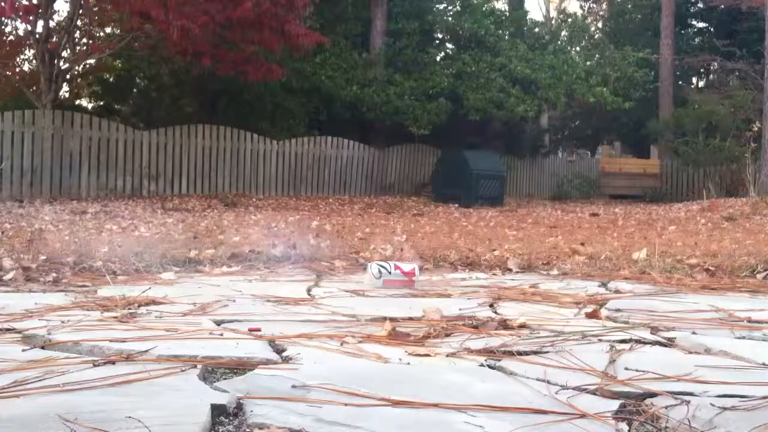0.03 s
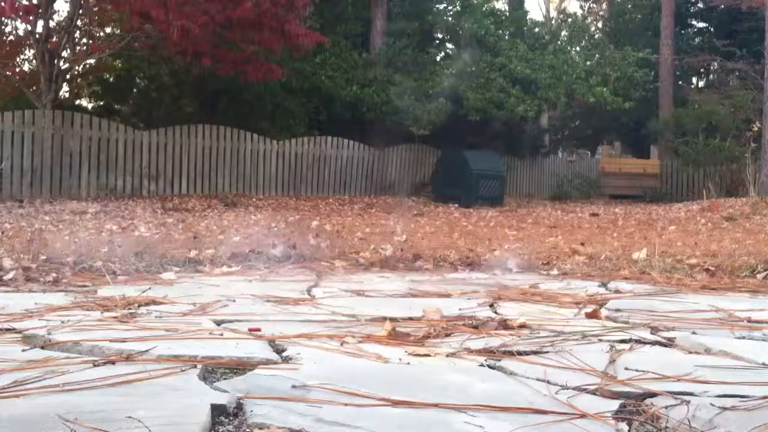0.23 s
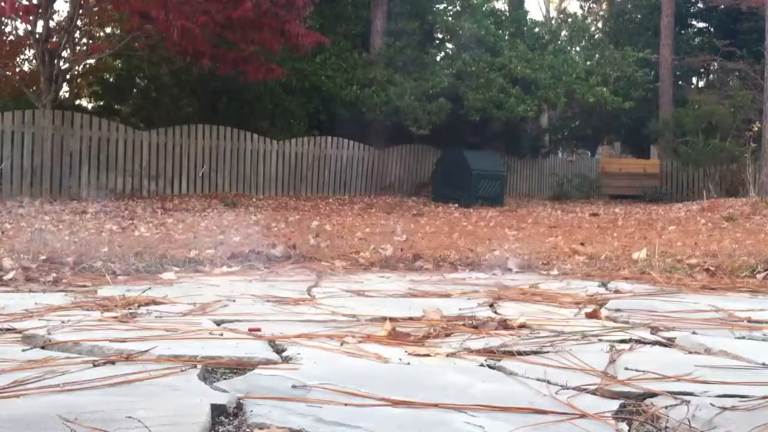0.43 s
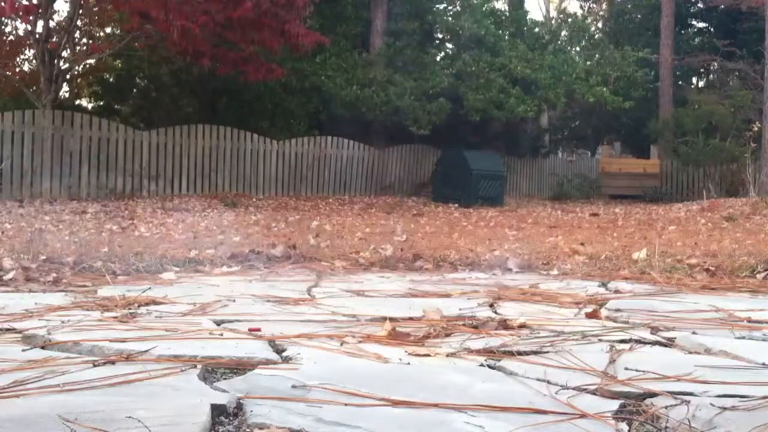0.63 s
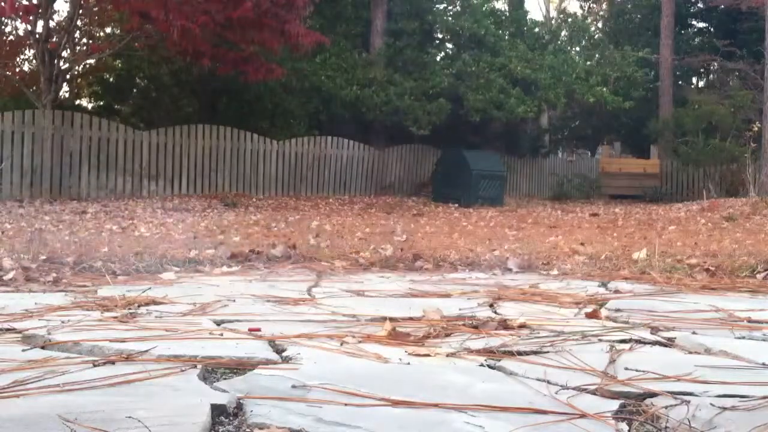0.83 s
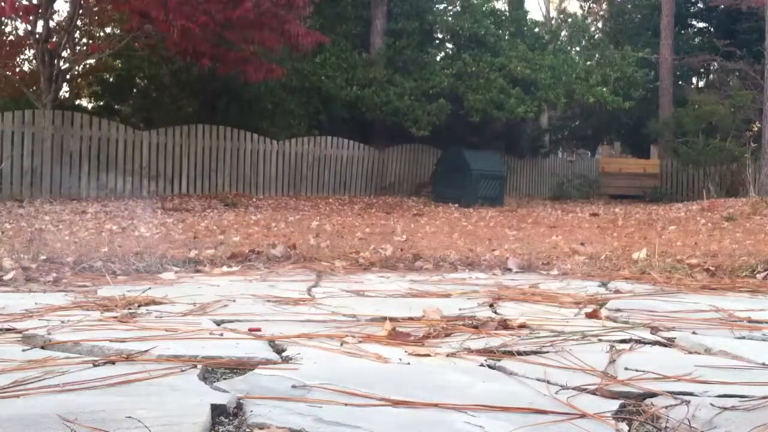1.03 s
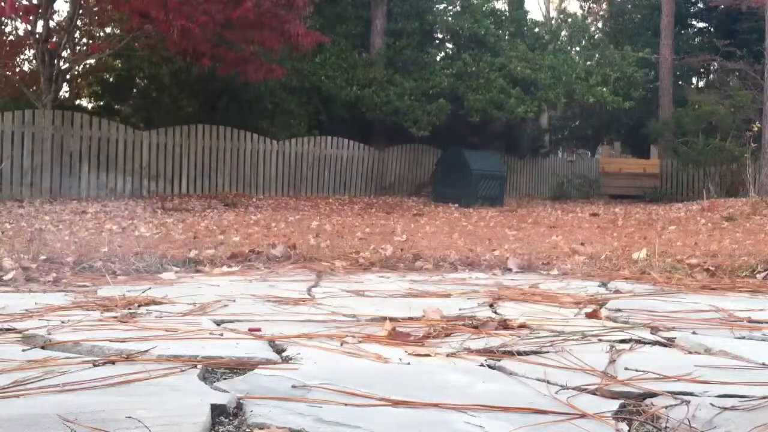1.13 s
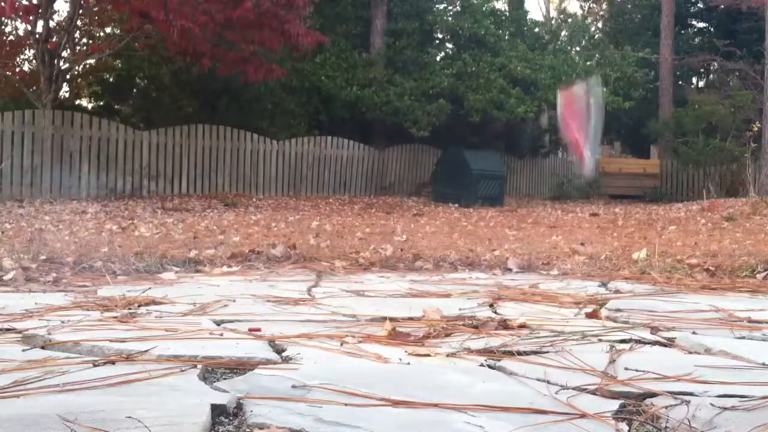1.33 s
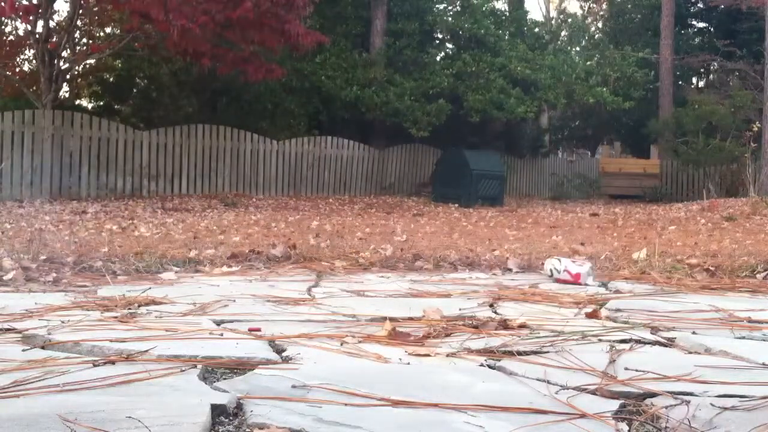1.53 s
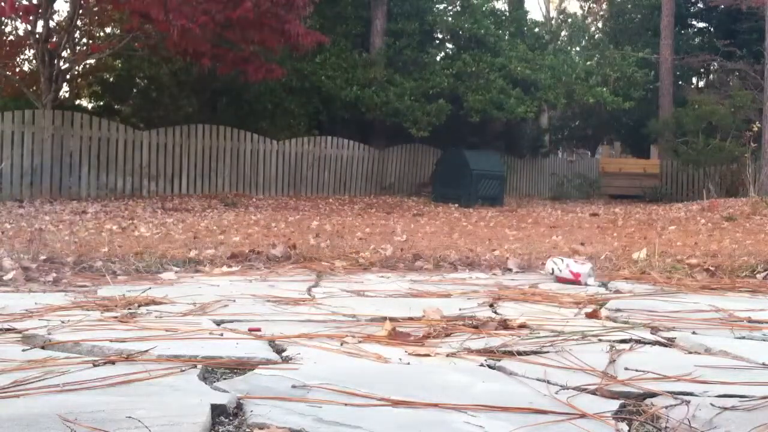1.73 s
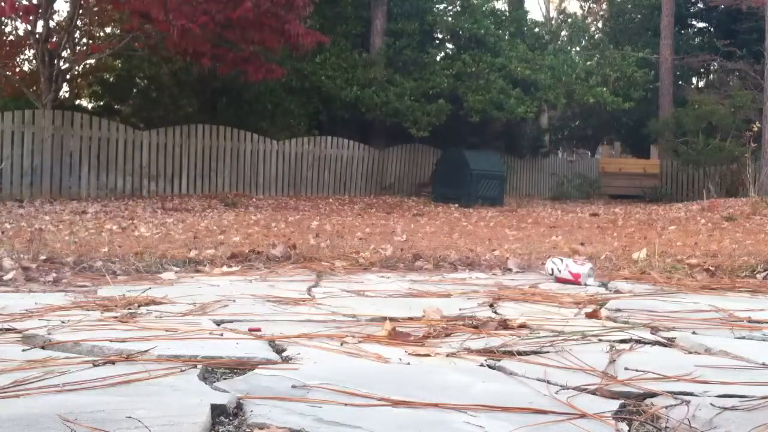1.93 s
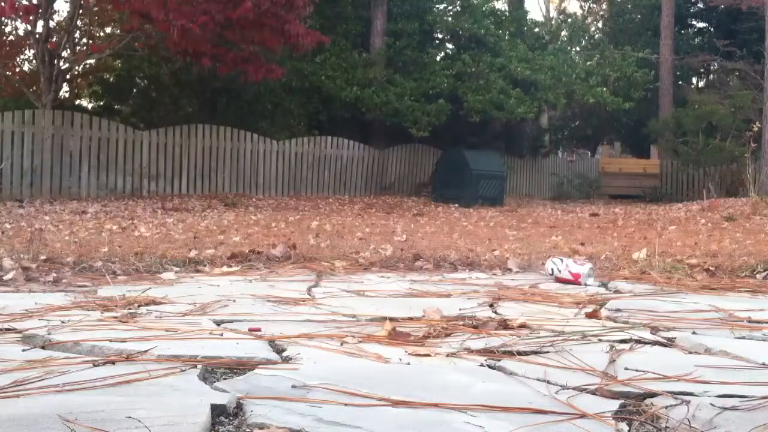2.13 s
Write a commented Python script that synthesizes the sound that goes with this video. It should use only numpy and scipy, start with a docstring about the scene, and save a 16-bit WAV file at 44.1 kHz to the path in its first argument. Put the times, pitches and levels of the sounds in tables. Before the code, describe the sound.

A firecracker goes off with one loud, sharp bang that echoes briefly around a backyard. Over a second later, an empty drink can clacks down on a stone patio and bounces, over a faint steady hiss.

```python
"""A machine hums faintly over a steady hiss in a fenced backyard.
At 0.19 s a firecracker blows a drink can off the stone patio; a near wall slaps the bang back,
then fence and trees scatter it. A limiter ducks at the bang and recovers slowly.
A speck of debris ticks at 0.45 s. At 1.55 s the can clacks down and bounces, its thin metal ringing."""
import sys
import numpy as np
from scipy import signal
from scipy.fft import rfft, irfft
from scipy.io import wavfile
from scipy.ndimage import uniform_filter1d, minimum_filter1d

SR = 44100
rng = np.random.default_rng(int(sys.argv[2]) if len(sys.argv) > 2 else 0)


def int16_out(signal):
    """Quantize to a 16-bit WAV file."""
    q = np.round(np.clip(np.atleast_2d(signal).T, -1, 1) * 32767)
    wavfile.write(sys.argv[1], SR, q.astype(np.int16))


N = 97020


def amp(db):
    """Decibels to gain."""
    return 10 ** (np.asarray(db) / 20)


def unit(x):
    """Scales to rms 1."""
    return x / np.sqrt(np.mean(x ** 2) + 1e-20)


def lookup(table, hz, column=1):
    """One table column, interpolated along log frequency."""
    columns = np.transpose(table)
    return np.interp(np.log(hz + 1), np.log(columns[0]), columns[column])


def late(x, delay_s):
    """Delays a sound and fits it to the scene length."""
    return np.pad(x, (max(round(delay_s * SR), 0), N))[:N]


def high_pass(x, corner_hz):
    """Second-order bass cut."""
    return signal.sosfilt(signal.butter(2, corner_hz, "high", fs=SR, output="sos"), x)


def drift(rate_hz):
    """Slow random wander of rms 1."""
    hz = np.fft.rfftfreq(N, 1 / SR)
    return unit(irfft(rfft(rng.standard_normal(N)) * np.exp(-(hz / rate_hz) ** 2), N))


def decaying_noise(table, grain_db=0, t60_scale=1, bands=24):
    """Noise burst with its own energy and decay time in each band."""
    t, hz = np.arange(SR) / SR, np.fft.rfftfreq(SR, 1 / SR)
    noise = unit(rng.standard_normal(SR) * amp(grain_db * rng.standard_normal(SR)))
    spectrum = rfft(noise) * amp(lookup(table, hz))
    centres_hz = np.geomspace(table[0][0], table[-1][0], bands)
    out = np.zeros(SR)
    for centre_hz, weights in zip(centres_hz, np.eye(bands)):
        band = irfft(spectrum * np.interp(hz, centres_hz, weights), SR)
        fade = amp(-60 * t / (t60_scale * lookup(table, centre_hz, column=2)))
        out += band * fade / np.linalg.norm(fade)
    return out


# Outdoor hiss. Each row: frequency in Hz, relative density in dB.
AIR_SPECTRUM = [(25, -29), (65, -31), (125, 0), (300, 1), (510, 0.5), (800, -9), (1200, -9.5), (1750, -5.5),
                (2400, -9.5), (3000, -4.5), (3700, -9.5), (4600, -7.5), (5100, -11), (5700, -7.5),
                (6500, -12), (8300, -15.5), (10500, -29.5), (15500, -41)]

def air():
    """Steady outdoor hiss."""
    gain = amp(lookup(AIR_SPECTRUM, np.fft.rfftfreq(N, 1 / SR)))
    return amp(-59) * unit(irfft(rfft(rng.standard_normal(N)) * gain, N))


# Machine tones. Each row: frequency in Hz, rms level in dB.
HUM_TONES = [(120.5, -80), (191.5, -64.5), (338.7, -63.5), (383, -60.5), (530, -70), (559, -77.5),
             (663, -79.5), (1737.3, -72.5), (4476, -77.5), (4601, -75.5)]

def machine(waver_hz=.5, waver_db=.8):
    """A distant machine hums; each tone wavers in level and pitch."""
    t, hum = np.arange(N) / SR, np.zeros(N)
    for hz, db in HUM_TONES:
        gain = np.sqrt(2) * amp(db + waver_db * drift(rate_hz=2.6))
        cycles = hz * t + np.cumsum(waver_hz * drift(rate_hz=5.76)) / SR
        hum += gain * np.sin(2 * np.pi * (cycles + rng.random()))
    return hum


# Single echoes. Each row: delay in seconds, level in dB.
SURFACE_ECHOES = [(0.0123, -9), (.0245, -25), (0.0414, -12), (.049, -14.5), (0.0538, -16), (0.08, -19),
                  (0.137, -28.5)]
# Response of one surface. Each row: frequency in Hz, level in dB, T60 in seconds.
SURFACE_BANDS = [(100, -58, .02), (300, -26, 0.018), (1500, -8.5, 0.017), (3300, -5.5, 0.024),
                 (6000, -9, .03), (11000, -8, 0.0207), (14980, -21, .02)]

def rough_surfaces(x):
    """Each rough surface returns one smeared echo without bass."""
    response = sum(amp(db) * late(decaying_noise(SURFACE_BANDS, grain_db=3, bands=8), delay_s)
                   for delay_s, db in SURFACE_ECHOES)
    return signal.fftconvolve(x, high_pass(response, corner_hz=700))[:N]


def scatter(x, table, delay_s, rise_s, t60_scale=1):
    """A swarm of small echoes sets in after a delay."""
    onset = 1 - np.exp(-np.arange(SR) / SR / rise_s)
    response = onset * decaying_noise(table, grain_db=3.5, t60_scale=t60_scale)
    return late(signal.fftconvolve(x, response), delay_s)


# Near and far scatter. Each row: frequency in Hz, level in dB, T60 in seconds.
NEAR_BANDS = [(40, -41, .1), (200, -24.5, 0.16), (700, -10.5, 0.11), (1520, -15.5, 0.12), (3500, -7, 0.14),
              (6040, -5.5, 0.098), (10100, -6, 0.17), (15000, -19, .1)]
FAR_BANDS = [(38.9, -36, 0.27), (127.7, -39, 0.6), (280, -19.5, 0.44), (700, -21.5, 0.81),
             (1620, -18, 0.92), (3400, -8.5, 0.63), (5600, -9, 0.42), (9900, -6.5, 0.34), (13000, -6, 0.18),
             (15600, -28, .2)]

def yard(x, near_db, far_db, far_t60_scale=1):
    """Echoes from nearby objects, then from fence, trees and rough surfaces."""
    near = scatter(x, NEAR_BANDS, delay_s=.0093, rise_s=.00033)
    far = scatter(x, FAR_BANDS, delay_s=.0485, rise_s=.00068, t60_scale=far_t60_scale)
    return amp(near_db) * near + amp(far_db) * (far + rough_surfaces(x))


# Debris tick. Each row: frequency in Hz, level in dB, T60 in seconds.
DEBRIS_BANDS = [(500, -44, .02), (3000, -30, .025), (7000, -27, .025),
                (11000, -32, .025), (15000, -52, .02)]

def debris():
    """A speck ticks on the stone."""
    return late(decaying_noise(DEBRIS_BANDS, grain_db=3, bands=8), delay_s=.453)


# Can modes and crumpled-wall bands. Each row: frequency in Hz, level in dB, T60 in seconds.
CAN_MODES = [(635, -25, .055), (716, -21, .06), (797, -22, .055), (925, -28, .06), (1196, -30, .06),
             (1557, -22, .045), (1635, -22, .05), (1743, -23, .055), (2010, -21, .075), (2157, -29, .19),
             (2213, -34, .14), (2560, -29, .05), (2860, -27, .05), (2940, -29, .09), (3085, -29, .1),
             (3200, -43, .1), (3580, -26, .075), (3645, -30, .07), (4300, -29, .09), (4450, -31, .11),
             (4556, -29, .1), (4940, -32, .05), (5800, -33, .07), (5970, -33, .06), (6610, -28, .06),
             (7320, -29, .045), (8130, -24, .035)]
SHELL_BANDS = [(100, -7, .06), (483, 3, .06), (763, 15.5, 0.026), (1290, 8, 0.1), (2800, 13, 0.044),
               (5060, 8, 0.066), (7600, 4.5, 0.042), (11700, -6, 0.074), (15800, -18, 0.058)]

def can_ring(t60_scale, shell_db=1):
    """Struck thin metal: distinct modes plus the dense, short modes of the crumpled wall."""
    t = np.arange(SR) / SR
    modes = sum((-1) ** k * amp(db - 60 * t / (t60_s * t60_scale)) * np.sin(2 * np.pi * hz * t)
                for k, (hz, db, t60_s) in enumerate(CAN_MODES))
    return modes + amp(shell_db) * decaying_noise(SHELL_BANDS, grain_db=3, t60_scale=t60_scale)


# Can on stone. Each row: start in seconds, level in dB, low-pass corner in Hz, T60 scale.
CAN_CONTACTS = [(1.549, -3, 12000, 0.21), (1.5508, 1, 13000, 0.98), (1.5595, -13, 9000, 0.4),
                (1.5645, -11.5, 6960, 0.43), (1.5725, -14.5, 4350, 0.57), (1.6575, -9, 1630, 0.25),
                (1.667, -25, 1510, 1), (1.959, -36.5, 1600, 0.39)]
# Landing thud. Each row: frequency in Hz, level in dB, T60 in seconds.
THUD_BANDS = [(25, -5, .07), (60, -6.5, 0.081), (199, 2, 0.1), (380, 5, 0.12), (600, -7, .05),
              (3000, -45, .03)]

def bouncing_can():
    """Each contact rings the can; softer ones tend to be duller, and only the first thuds."""
    clacks = np.zeros(N)
    for start_s, db, corner_hz, t60_scale in CAN_CONTACTS:
        low_pass = signal.butter(3, corner_hz, fs=SR, output="sos")
        clacks += amp(db) * late(signal.sosfilt(low_pass, can_ring(t60_scale)), start_s)
    thud = late(decaying_noise(THUD_BANDS, bands=8), CAN_CONTACTS[0][0])
    direct = high_pass(clacks, corner_hz=463) + thud
    return direct + yard(direct, near_db=-12.5, far_db=-11.5, far_t60_scale=.59)


def pulse(spectrum, size=8192):
    """Minimum-phase pulse: the sharpest causal one with this spectrum."""
    log_gain = np.log(amp(lookup(spectrum, abs(np.fft.fftfreq(size, 1 / SR)))))
    response = np.exp(np.conj(signal.hilbert(log_gain)))
    return np.fft.ifft(response).real[:size // 2]


# Shock front, pressure push and wall slap. Each row: frequency in Hz, level in dB.
SHOCK_SPECTRUM = [(100, -3), (900, 14), (2200, 13), (5000, 8.5), (8000, 2.5), (11000, -9), (16000, -33)]
PUSH_SPECTRUM = [(25, -7.5), (60, 10.5), (120, 31.5), (190, 38.5), (400, 27.5), (900, 18), (2000, 18),
                 (5000, 5.5), (16000, -13)]
SLAP_SPECTRUM = [(25, -13), (60, 12.5), (120, 30), (190, 34.5), (400, 27), (900, 20), (2000, 12.5),
                 (5000, -14), (9000, -28), (16000, -40)]

def firecracker(start_s=.189, push_lag_s=.0001, ground_lag_s=.00041, wall_lag_s=.0093):
    """A shock front and low push, the shock's bounce off the stone, the wall slap and the yard echoes."""
    shock = late(pulse(SHOCK_SPECTRUM), start_s)
    blast = shock - late(pulse(PUSH_SPECTRUM), start_s + push_lag_s)
    ground_bounce = amp(2) * late(shock, ground_lag_s)
    wall_slap = late(pulse(SLAP_SPECTRUM), start_s + wall_lag_s)
    return blast + ground_bounce + wall_slap + yard(blast, near_db=3, far_db=2.5)


def scene():
    """All sources at one microphone."""
    return (debris() + amp(2) * firecracker() + bouncing_can() + machine() + air())[None]


def record(dry, limit_db=-3.5, recovery_db_per_s=5.5, band_edge_hz=16200):
    """Peak limiter with slow recovery, then a band limit."""
    over_db = np.maximum(20 * np.log10(abs(dry[0]) + 1e-9) - limit_db, 0)
    recovery_db = np.arange(N) / SR * recovery_db_per_s
    gain_db = recovery_db - np.maximum.accumulate(over_db + recovery_db)
    gain_db = uniform_filter1d(minimum_filter1d(gain_db, size=129), size=65)  # smooth look-ahead
    low_pass = signal.firwin(511, band_edge_hz, window=("kaiser", 9), fs=SR)
    return signal.oaconvolve(dry * amp(gain_db), low_pass[None], "same")


dry = scene()
out = record(dry)
int16_out(out)
```